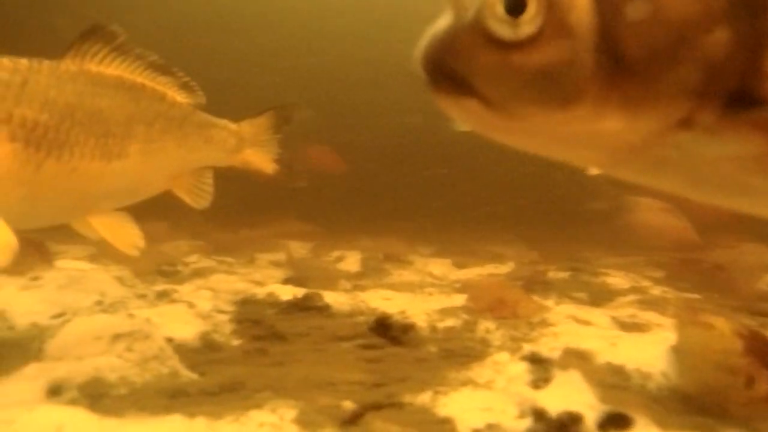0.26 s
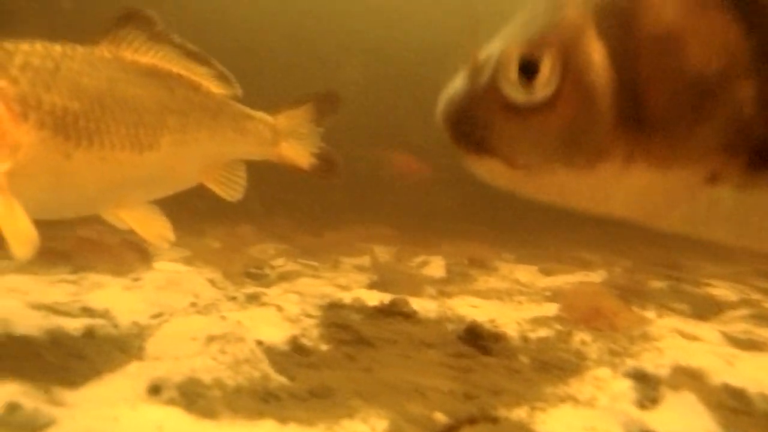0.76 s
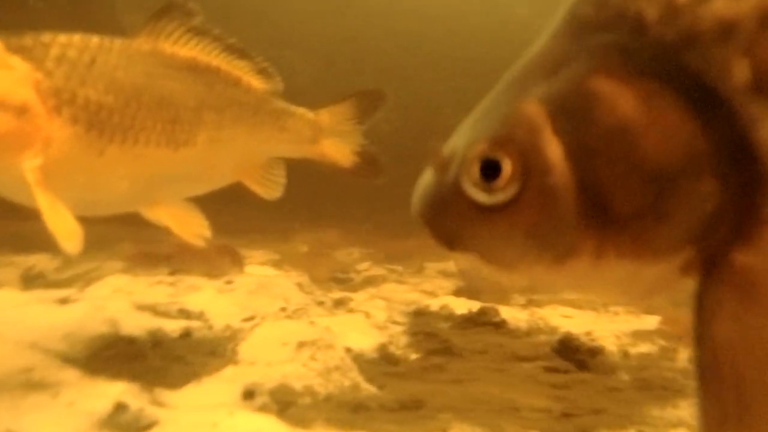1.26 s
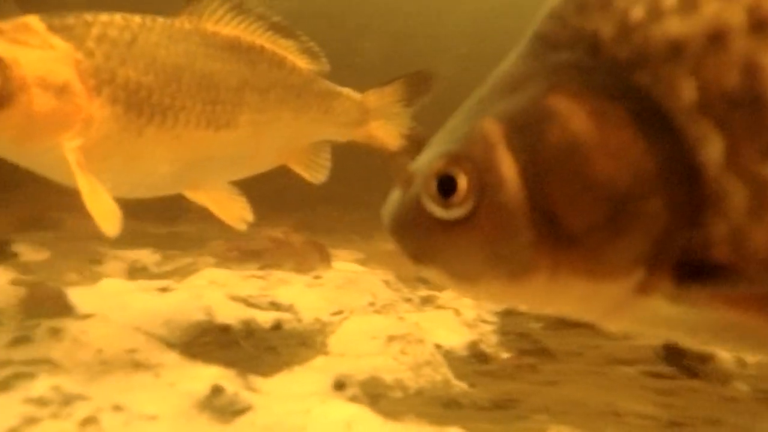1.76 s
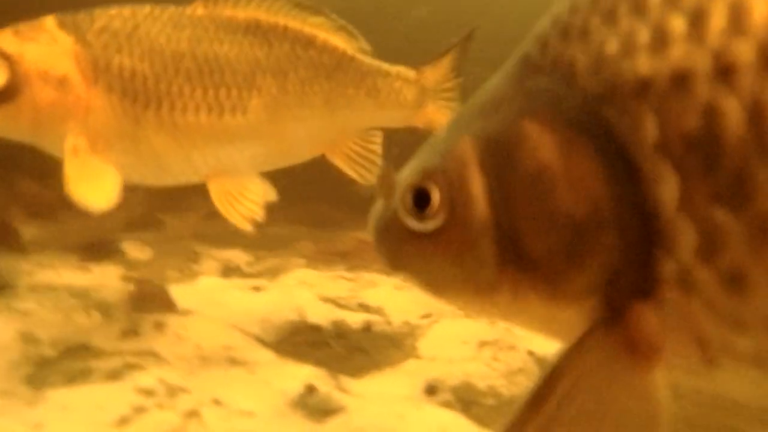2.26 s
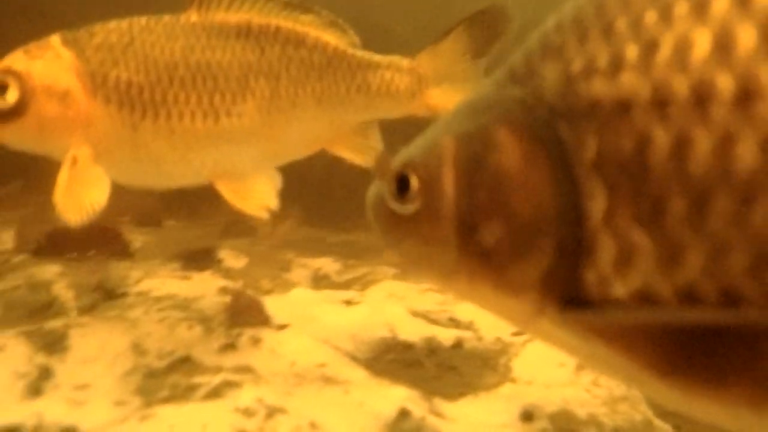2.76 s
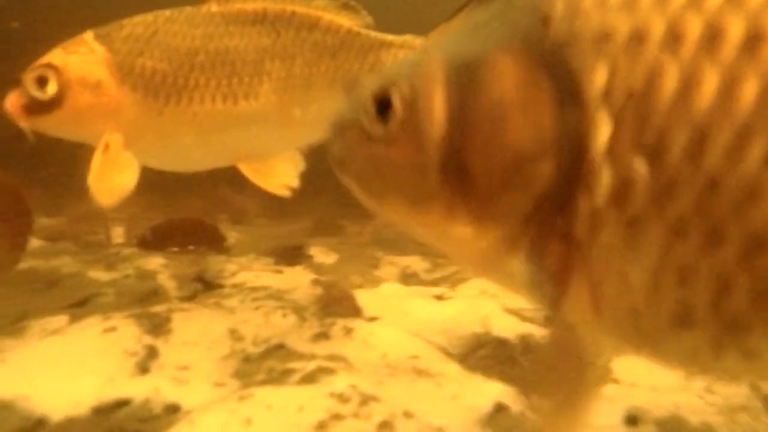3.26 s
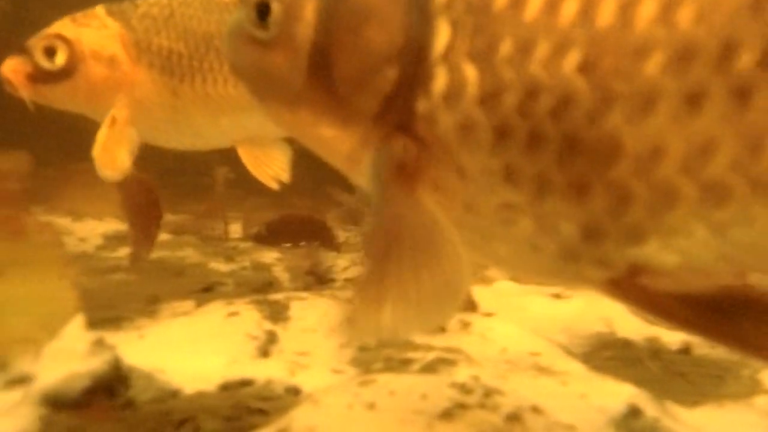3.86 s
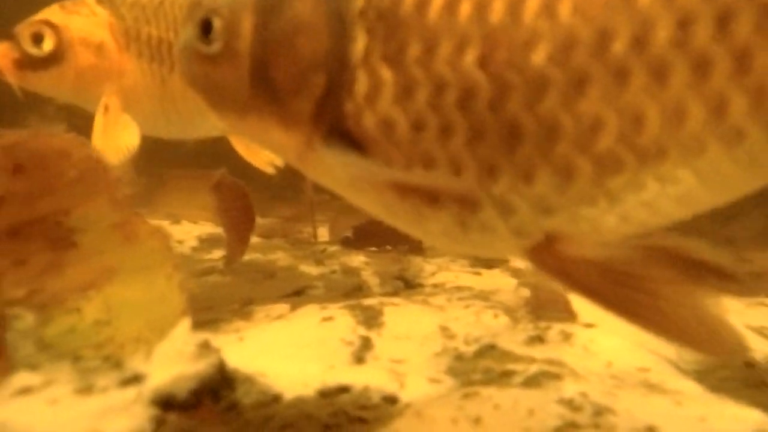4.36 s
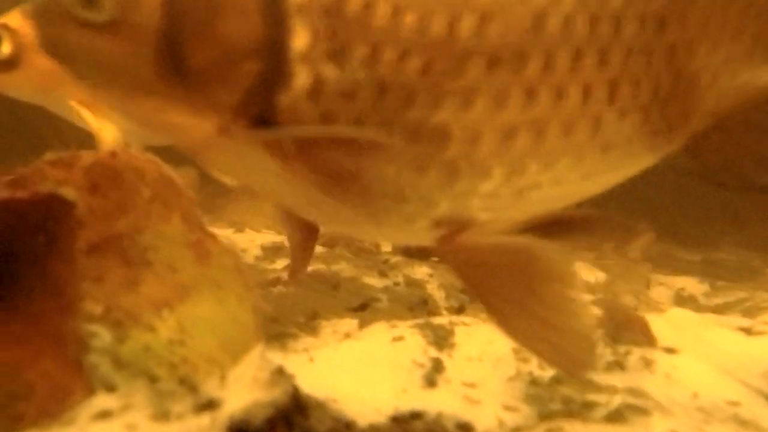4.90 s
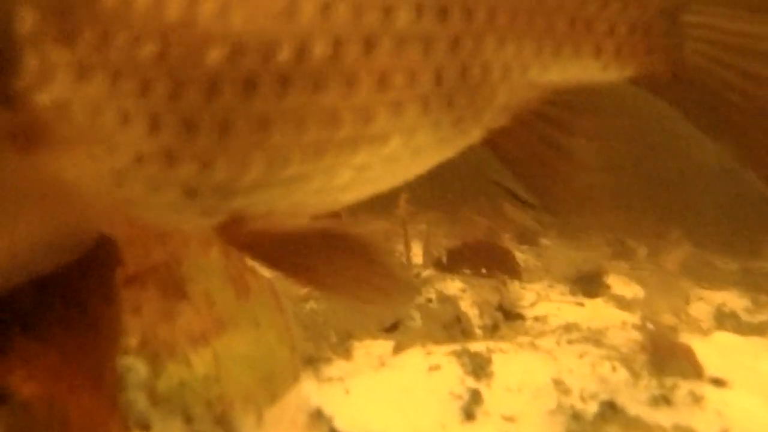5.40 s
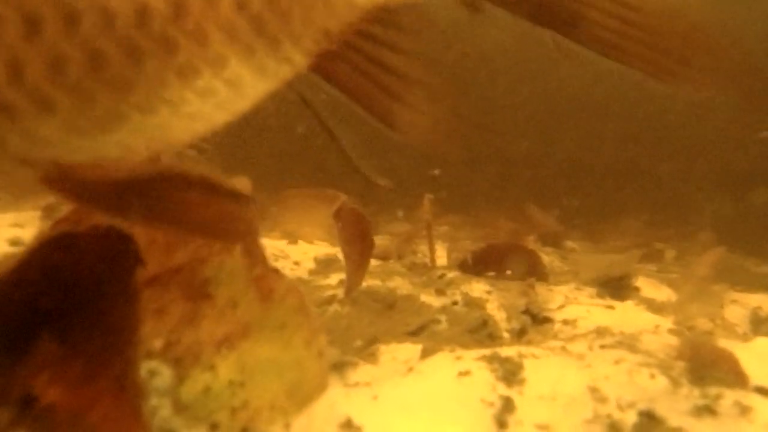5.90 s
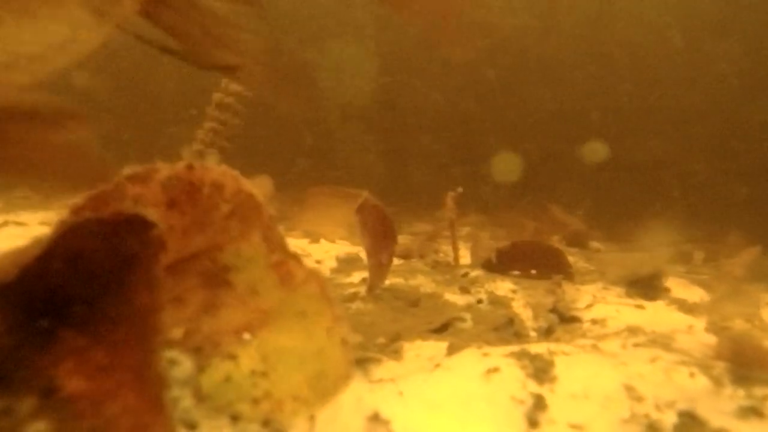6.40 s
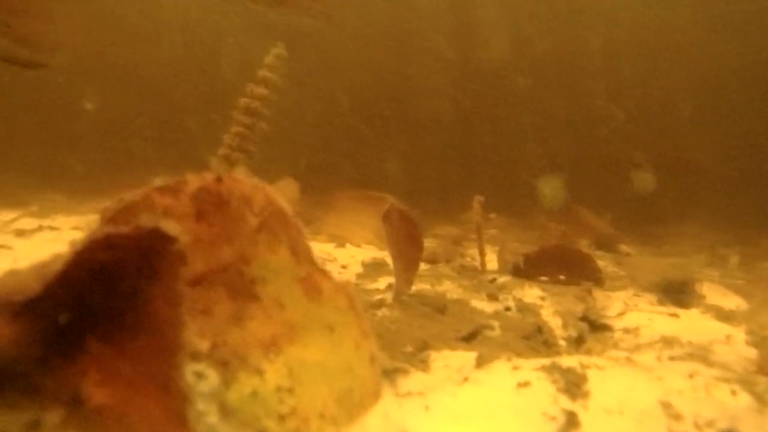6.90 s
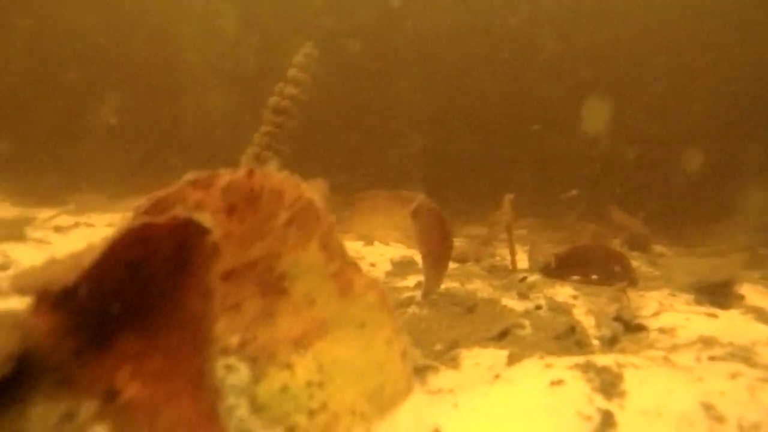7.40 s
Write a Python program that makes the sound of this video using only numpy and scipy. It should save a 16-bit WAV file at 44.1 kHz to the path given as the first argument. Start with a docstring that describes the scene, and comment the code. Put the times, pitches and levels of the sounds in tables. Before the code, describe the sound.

Close underwater pickup on a shallow pond bed. Large air bubbles break off in a rapid, uneven stream, each a short dull bloop rising slightly in pitch, with crowds of smaller bubbles filling the gaps. The sound is boxed into a narrow, hollow midrange by water and housing. Far beneath lie faint pump hum, soft hiss, tiny pings and camera ticking. The fish passing by make no distinct sound.

```python
"""About 7.7 seconds on the bed of a shallow pond, where air bubbles break off near a camera.
From start to end, large bubbles follow each other as dull short bloops with crowds of small ones around them.
Each is a fading tone of rising pitch, dulled by water and housing that pass only a narrow midrange band.
Beneath them all along lie a pump's faint hum and rumble, tiny high pings, filtered-noise hiss and treble,
and the camera's ticks at the picture rate. From about 2 seconds on, some single tiny pings join in."""
import sys
import numpy as np
from scipy import signal
from scipy.fft import rfft, irfft, next_fast_len
from scipy.io import wavfile
from scipy.ndimage import map_coordinates

SR = 44100
rng = np.random.default_rng(int(sys.argv[2]) if len(sys.argv) > 2 else 0)


def transcribe(signal):
    """Save signal, clipped to [-1, 1], as a 16-bit WAV file at the path in sys.argv[1]."""
    frames = np.atleast_2d(signal).T
    limited = np.clip(frames, -1, 1)
    pcm = np.round(limited * 32767).astype(np.int16)
    wavfile.write(sys.argv[1], SR, pcm)


N = 337365  # length in samples

# Circuit hiss colour. Each row: frequency in Hz, relative level in dB per Hz.
HISS_COLOUR = [(590, 0), (1000, -6.5), (1300, -4.5), (1480, -4.5), (1950, -4.5), (2210, -5.5), (2450, -6.5),
               (4870, -9), (7280, -10.5), (8260, -5), (10800, -13.5), (14500, -13), (15500, -17)]
# Treble noise colour. Each row: frequency in Hz, relative level in dB per Hz.
TREBLE_COLOUR = [(5000, -38), (8500, -7.5), (10000, -3.5), (12000, -9), (14500, -3), (16000, -5.5)]
# Camera bursts. Each row: place in the picture period from 0 to 1, relative level in dB.
TICK_BURSTS = [(.355, 3), (.52, 1), (.97, 1)]
# Colour of those bursts. Each row: frequency in Hz, relative level in dB.
TICK_COLOUR = [(3000, -50), (6000, -10), (7400, -5), (8050, -1.5), (8500, -7.5), (10100, -2.5),
               (10600, -22), (15500, -15)]
# Pump hum tones. Each row: frequency in Hz, middle peak level in dB, around which it wavers.
PUMP_HUM = [(101, -77), (200, -78), (302, -78.5)]
# Low rumble colour. Each row: frequency in Hz, relative level in dB per Hz.
RUMBLE_COLOUR = [(15, -28), (30, -18.5), (60, -8.5), (110, -4.5), (190, -7), (250, -20.5), (300, -11),
                 (400, -5), (1000, -15), (1400, -90)]
# Single tiny bubbles. Each row: start in seconds, peak level in dB, starting pitch in Hz,
# time to fade by 60 dB in seconds.
TINY_BUBBLES = [(1.935, -61.5, 1490, 0.095), (1.992, -60, 1480, .05), (3.524, -58.5, 2180, 0.034),
                (3.572, -61, 1500, .05), (3.887, -61, 4020, 0.027), (4.021, -60, 3870, .04),
                (4.148, -61, 2230, .04), (4.3, -63, 1260, .03), (4.335, -61, 1520, .03),
                (4.37, -63, 1150, .03), (4.9, -62.5, 4100, .04), (5.085, -63, 2210, 0.059),
                (5.1, -62, 2250, 0.05), (5.125, -65, 2250, .06), (5.166, -61.5, 2130, 0.037),
                (5.95, -64, 2250, .06), (6.215, -65, 3880, 0.046), (6.405, -63, 3850, 0.045),
                (6.6, -64, 2260, .05), (7.262, -62.5, 2700, .05), (7.315, -60, 1500, .05)]
# Tiny bubble sizes that keep recurring. Each row: middle pitch in Hz, rms level of the whole group in dB.
TINY_SIZES = [(1120, -87.5), (1490, -84.5), (2200, -85), (3880, -87)]
# Large bubbles. Each row: start in seconds, peak level in dB, starting pitch in Hz,
# time to fade by 60 dB in seconds (held between 0.003 and 0.15 when played).
LARGE_BUBBLES = [(.009, -39, 566, .02), (.045, -38.5, 720, 0.12), (.09, -39.5, 665, 0.033),
                 (.153, -27.5, 576, 0.024), (.255, -33, 655, 0.015), (.277, -34.5, 629, 0.061),
                 (.302, -35.5, 674, .022), (.327, -36, 590, .04), (.362, -32.5, 557, 0.04),
                 (.422, -30, 670, 0.021), (.44, -35.5, 426, .01), (.482, -39.5, 622, 0.19),
                 (.549, -39.5, 654, 0.068), (.62, -30, 650, 0.021), (.685, -36, 585.5, 0.17),
                 (.753, -26, 578, 0.038), (.796, -30, 566, 0.048), (.817, -29, 488, .035),
                 (.841, -36, 662, 0.057), (.888, -35, 740, 0.03), (.924, -36, 660, 0.029),
                 (.957, -36.5, 530, .007), (1.017, -34.5, 702, 0.051), (1.073, -29.5, 663, 0.073),
                 (1.126, -35, 672, 0.083), (1.152, -40, 626, 0.11), (1.194, -41.5, 567, 0.11),
                 (1.291, -32, 713, 0.12), (1.325, -33.5, 688, 0.064), (1.366, -34.5, 705, 0.038),
                 (1.412, -32, 692, 0.089), (1.467, -31, 585, 0.023), (1.499, -26, 609, 0.04),
                 (1.534, -35, 583, 0.08), (1.586, -34.5, 543, .057), (1.641, -31, 570, 0.046),
                 (1.665, -34.5, 624, 0.085), (1.701, -36, 559, 0.17), (1.743, -34.5, 588, 0.084),
                 (1.782, -31.5, 600, .1), (1.822, -29.5, 653, 0.07), (1.887, -34, 637, .043),
                 (1.92, -33, 580, 0.061), (1.961, -31.5, 580, 0.06), (1.988, -33.5, 578, 0.16),
                 (2.011, -33, 494, .15), (2.027, -32.5, 533, 0.023), (2.044, -34.5, 668, 0.24),
                 (2.059, -33.5, 485.4, 0.24), (2.129, -32, 592, 0.047), (2.17, -33, 694, 0.082),
                 (2.193, -32, 687, 0.05), (2.236, -37, 724, 0.063), (2.262, -35.5, 656, 0.0091),
                 (2.357, -36.5, 562, 0.12), (2.395, -29, 567, 0.037), (2.439, -36, 670, 0.06),
                 (2.532, -30, 646, 0.053), (2.558, -28, 636.6, .14), (2.576, -32.5, 683, 0.042),
                 (2.686, -31, 581.5, 0.18), (2.724, -31, 613, 0.0091), (2.756, -27, 686, 0.066),
                 (2.841, -31, 673, 0.032), (2.885, -36.5, 434, 0.16), (2.915, -30, 460, 0.012),
                 (2.935, -33, 638, 0.048), (2.967, -32.5, 666, 0.054), (3.019, -34, 640, 0.062),
                 (3.081, -27, 704, 0.078), (3.12, -25.5, 725, 0.11), (3.171, -29, 592, 0.057),
                 (3.213, -36, 617, 0.056), (3.285, -38, 586, .1), (3.307, -37, 621, 0.11),
                 (3.374, -39, 596, 0.082), (3.4, -38, 605, 0.084), (3.45, -37.5, 574, 0.036),
                 (3.506, -33, 640, 0.058), (3.573, -30.5, 740, 0.23), (3.65, -34, 640, 0.025),
                 (3.755, -38.5, 618, 0.055), (3.803, -40, 600, 0.045), (3.838, -34.5, 582, 0.088),
                 (3.888, -27.5, 576, 0.065), (3.945, -28.5, 581.4, 0.11), (3.995, -34, 577.5, 0.11),
                 (4.142, -41.5, 606, .045), (4.193, -43.5, 694, 0.16), (4.324, -37.5, 646, 0.059),
                 (4.355, -33, 627, 0.02), (4.376, -37, 600, 0.067), (4.397, -31.5, 587, 0.023),
                 (4.435, -37.5, 676, 0.18), (4.483, -36, 694, 0.051), (4.511, -35, 450, 0.026),
                 (4.559, -37, 654, 0.06), (4.645, -40.5, 628, 0.095), (4.694, -30.5, 600, 0.037),
                 (4.72, -28, 605, 0.013), (4.774, -38.5, 610, .05), (4.856, -31.5, 609, .084),
                 (4.936, -29, 575, 0.044), (4.979, -37.5, 642, 0.089), (5.068, -25, 490, 0.0088),
                 (5.078, -38, 653, 0.029), (5.12, -29.5, 500, 0.0092), (5.176, -40.5, 614, 0.107),
                 (5.249, -30.5, 634, .016), (5.312, -36, 656, .008), (5.344, -34.5, 775, 0.049),
                 (5.377, -35.5, 660, 0.025), (5.461, -41.5, 655, .07), (5.618, -39, 620, 0.038),
                 (5.639, -32, 686, 0.054), (5.664, -34, 600, .01), (5.744, -39, 539, 0.18),
                 (5.799, -30, 574, 0.052), (5.844, -36.5, 610, 0.047), (5.899, -36.5, 530, 0.016),
                 (6.023, -27, 672, 0.071), (6.054, -37, 647, 0.041), (6.095, -31, 623, 0.064),
                 (6.131, -32.5, 596, 0.085), (6.217, -37.5, 579, 0.15), (6.251, -31, 610, .011),
                 (6.269, -29.5, 450, 0.015), (6.288, -31.5, 530, 0.084), (6.376, -34, 540, 0.024),
                 (6.431, -31.5, 680, 0.017), (6.457, -34.5, 686, 0.051), (6.556, -39, 615, 0.06),
                 (6.598, -37, 600, .045), (6.619, -33.5, 690, 0.027), (6.666, -25.5, 685, 0.037),
                 (6.741, -41.5, 682, .15), (6.86, -36, 485, .041), (6.946, -41, 632, 0.064),
                 (7.008, -39, 616, 0.047), (7.03, -33, 682, 0.039), (7.056, -34, 589, 0.13),
                 (7.093, -38.5, 565, 0.13), (7.151, -35, 613, 0.031), (7.165, -37.5, 670, 0.11),
                 (7.182, -31.5, 624, 0.073), (7.227, -34, 632, 0.11), (7.241, -36.5, 670, 0.092),
                 (7.31, -43, 625, 0.072), (7.355, -39.5, 704, 0.1), (7.382, -43.5, 598, 0.16),
                 (7.444, -32.5, 575, 0.14), (7.499, -27, 606, .082), (7.581, -40.5, 570, 0.13),
                 (7.6, -37.5, 555, 0.045), (7.624, -40, 584, 0.092)]
# Small bubbles between the large ones. Each row: time in seconds, base peak level in dB.
SMALL_BUBBLE_LEVEL = [(0, -44.5), (.5, -46), (1.15, -49), (1.9, -48), (2.4, -46.5), (3.4, -47), (4.1, -48),
                      (4.8, -47.5), (5.55, -50.5), (6.2, -48), (6.9, -49), (7.35, -46), (7.65, -46.5)]
# Path through water and housing. Each row: frequency in Hz, relative gain in dB.
WATER_PATH = [(90, -38.5), (200, -42), (310, -24.5), (345, -30.5), (400, -13), (460, -3.5), (550, -5),
              (605, 3), (655, -1.5), (705, -4), (755, -16), (830, -9), (890, -13.5), (960, -33.5),
              (1500, -53)]

FRAME_HZ = 29.97  # pictures per second
TOP_HZ = 15700  # the camera's band limit
LULL_S, LULL_DB = 0.024, -5  # small bubbles quieten while a large one swells at the outlet


def amp(db):
    """Turn a level in dB into a plain gain."""
    return 10 ** (np.asarray(db) / 20)


def unit(x):
    """Scale x to rms 1, a standard average strength."""
    return x / np.sqrt(np.mean(x ** 2) + 1e-20)


def along(points, hz):
    """Read the gain between (Hz, dB) points, with pitch on a log axis."""
    f, db = np.transpose(points)
    return amp(np.interp(np.log(hz + 1), np.log(f + 1), db))


def wobble(rate):
    """Draw a smooth random curve through `rate` random points a second."""
    points = rng.standard_normal(int(N * rate / SR) + 4)
    return map_coordinates(points, [np.arange(N) * rate / SR])


def filtered(x, response):
    """Multiply each frequency in x by the gain that response gives it."""
    size = next_fast_len(N + 8192)
    spectrum = rfft(x, size) * response(np.fft.rfftfreq(size, 1 / SR))
    return irfft(spectrum, size)[..., :N]


def noise(colour):
    """Make random noise of rms 1 with the given balance of frequencies."""
    return unit(filtered(rng.standard_normal(N), lambda hz: along(colour, hz)))


def causal(colour, size):
    """Build the response with this colour whose energy arrives as early as possible."""
    cepstrum = irfft(np.log(along(colour, np.fft.rfftfreq(size, 1 / SR))))
    # folding the second half onto the first gives the earliest arrival
    folded = np.where(np.arange(size) < size // 2, 2 * cepstrum, 0)
    folded = folded - np.eye(1, size)[0] * cepstrum[0]
    return np.exp(rfft(folded))


def rings(rows, rise, path=1, snap=0, size=8192):
    """Ring bubbles as fading tones of rising pitch, pass them along a path and set their peak levels."""
    s, db, hz, t60 = np.transpose(rows)[:, :, None]
    start = np.floor(s * SR)
    t = np.clip((np.arange(size // 2) - (s * SR - start)) / SR, 0, None)
    t60 = np.clip(t60, .003, .15)
    fade = amp(-60 * t / t60)
    tone = fade * np.sin(2 * np.pi * hz * t * (1 + rise * t / t60))
    tone = tone + snap * (t / 0.0004) * np.exp(-t / 0.00029)  # the neck pinches off with a short push
    tone = irfft(rfft(tone, size) * path, size)
    tone = tone * amp(db) / abs(tone).max(axis=1, keepdims=True)
    at = (np.clip(start, 0, None) + np.arange(size)).astype(int)
    return np.bincount(at.ravel(), tone.ravel(), N + 2 * size)[:N]  # add up all bubbles


def crowd(count, hz, spread, scatter_db, t60):
    """Draw chance bubbles: pitches spread around hz on a log scale, a few louder than the rest."""
    u = rng.random((count, 4))
    start = u[:, 0] * N / SR
    db = -scatter_db * np.log(u[:, 1])
    pitch = hz * np.exp(spread * np.log(u[:, 2] / (1 - u[:, 2])))
    return np.transpose([start, db, pitch, t60 * (.5 + u[:, 3])])


def hiss_and_treble():
    """Filter noise into a fluttering hiss and a high treble with fast random level changes."""
    treble = amp(2.5 * wobble(150)) * noise(TREBLE_COLOUR)
    hiss = amp(0.44 * wobble(25)) * noise(HISS_COLOUR)
    return amp(-68.5) * hiss + amp(-74.5) * treble


def camera():
    """Shape noise into a fuzzy narrow-band whine and three short bursts in every picture period."""
    place = np.arange(N) * FRAME_HZ / SR % 1  # 0 to 1 through each picture period
    gate = sum(amp(db) * np.exp(-((place - at) / 0.026) ** 2) for at, db in TICK_BURSTS)
    repeating = np.resize(rng.standard_normal(round(2 * SR / FRAME_HZ)), N)  # same in each pair of periods
    grain = rng.standard_normal(N) + .6 * repeating
    bursts = unit(filtered(gate * grain, lambda hz: along(TICK_COLOUR, hz)))
    # noise in a narrow band around 8222 Hz
    whine = unit(filtered(rng.standard_normal(N), lambda hz: 1 / (1 + ((hz - 8222) / 40) ** 4)))
    return amp(-79) * bursts + amp(-81.5) * whine


def pump():
    """Hum with steady-pitched tones that waver in level and phase, over a low noise rumble."""
    t = np.arange(N) / SR
    hum = 0
    for k, (hz, db) in enumerate(PUMP_HUM, start=1):
        level = amp(db + 3.2 * wobble(7.1))
        hum = hum + level * np.sin(2 * np.pi * hz * t + k * 0.91 * wobble(10))
    rumble = amp(-67.0 + 0.15 * wobble(3.5)) * noise(RUMBLE_COLOUR)
    return hum + rumble


def tiny_bubbles():
    """Ring faint high pings, mostly near a few recurring pitches: a smaller bubble rings higher."""
    pings = rings(TINY_BUBBLES, 0.042, size=4096)
    for hz, db in TINY_SIZES:
        rows = crowd(count=220, hz=hz, spread=0.029, scatter_db=0.85, t60=0.036)
        pings = pings + amp(db) * unit(rings(rows, 0.035, size=4096))
    return pings


def bubbles():
    """Large bubbles tear off clouds of small ones; all ring through the same narrow path."""
    path = causal(WATER_PATH, size=8192)
    large = rings(LARGE_BUBBLES, 0.062, path, snap=4.8)
    # a running average that lingers after each large bubble
    loudness = np.sqrt(signal.lfilter([1 / 300], [1, 1 / 300 - 1], large ** 2))

    rows = crowd(count=1500, hz=595.6, spread=0.209, scatter_db=0.77, t60=0.047)
    small_s = rows[:, 0]
    between = amp(np.interp(small_s, *np.transpose(SMALL_BUBBLE_LEVEL)))
    large_s = np.append(np.transpose(LARGE_BUBBLES)[0], np.inf)
    wait = large_s[np.searchsorted(large_s, small_s)] - small_s  # seconds until the next large bubble
    between = between * amp(LULL_DB * np.exp(-(wait / LULL_S) ** 2))

    cloud = amp(-6) * loudness[(small_s * SR).astype(int)]
    db = rows[:, 1] + 20 * np.log10(np.hypot(between, cloud))
    small = rings(np.column_stack([small_s, db, rows[:, 2:]]), 0.057, path, snap=1.75)
    return large + small


def scene():
    """Add all the sources together in one channel."""
    return (hiss_and_treble() + camera() + pump() + tiny_bubbles() + bubbles())[None]


def record(dry):
    """Remove everything above the camera's band limit."""
    return filtered(dry, lambda hz: hz < TOP_HZ)


dry = scene()
out = record(dry)
transcribe(out)
```